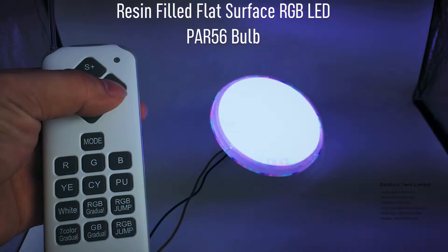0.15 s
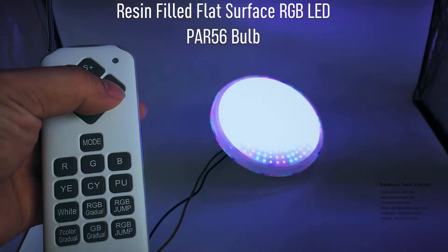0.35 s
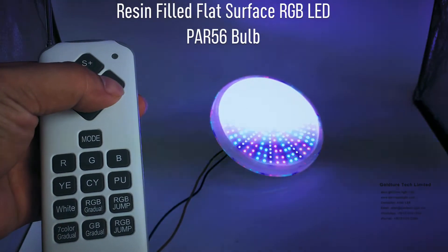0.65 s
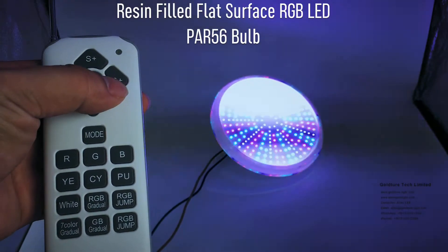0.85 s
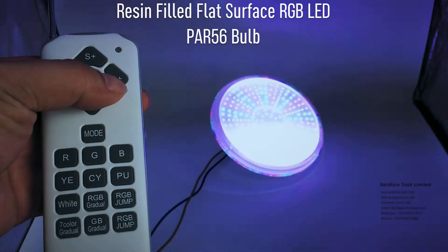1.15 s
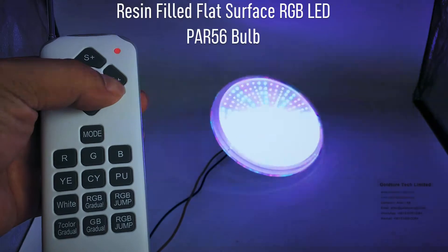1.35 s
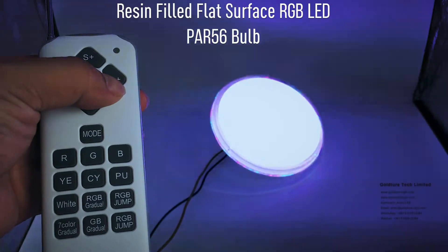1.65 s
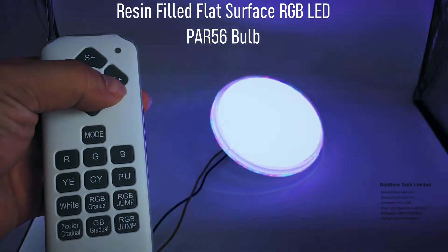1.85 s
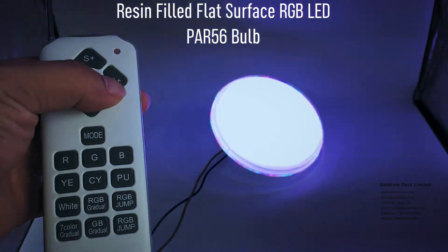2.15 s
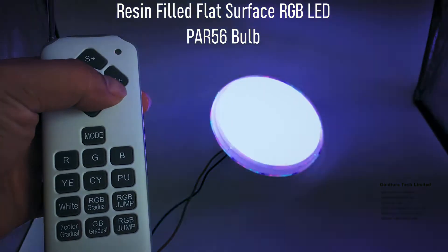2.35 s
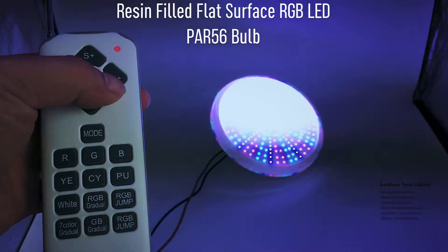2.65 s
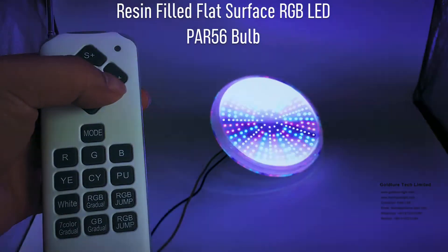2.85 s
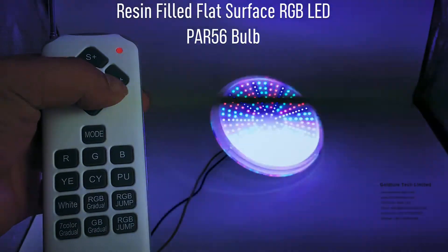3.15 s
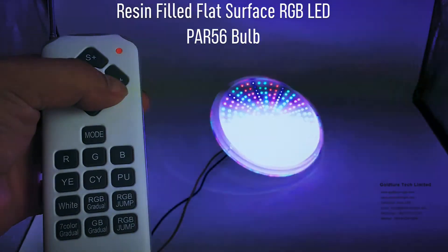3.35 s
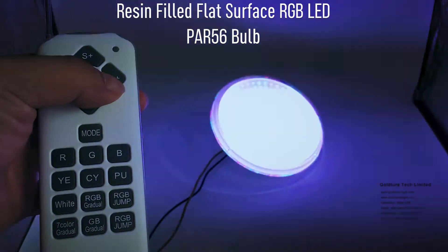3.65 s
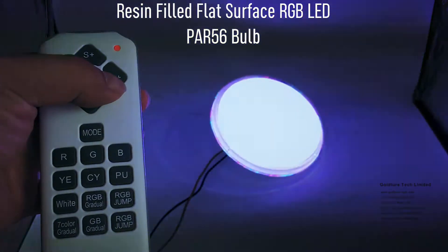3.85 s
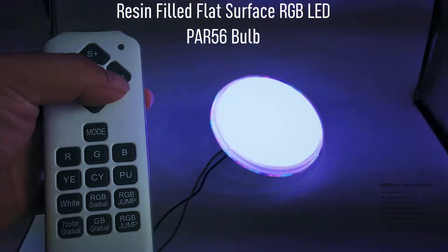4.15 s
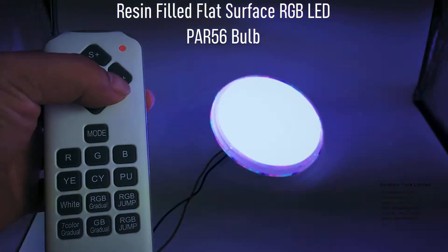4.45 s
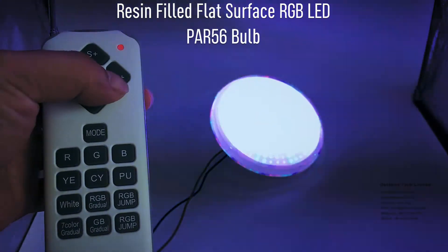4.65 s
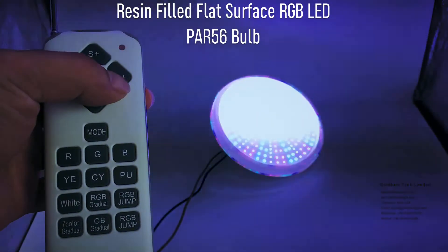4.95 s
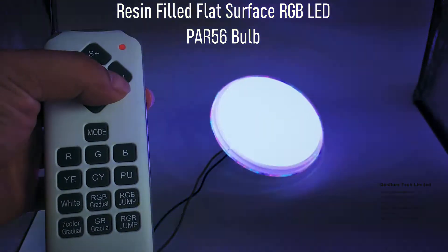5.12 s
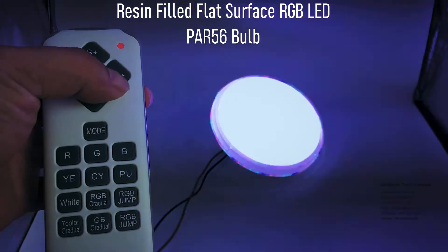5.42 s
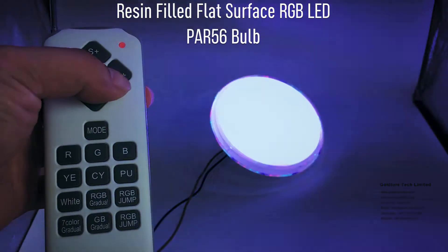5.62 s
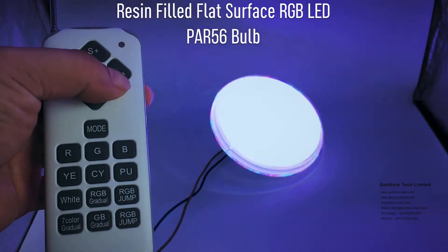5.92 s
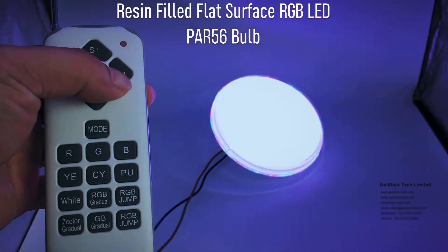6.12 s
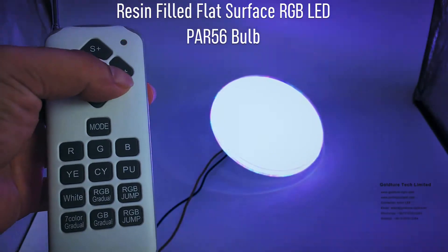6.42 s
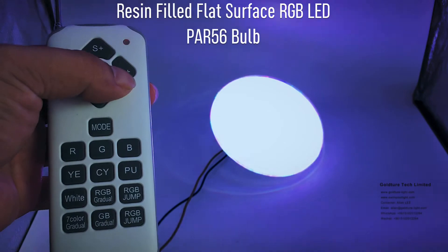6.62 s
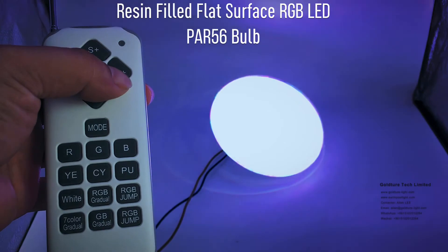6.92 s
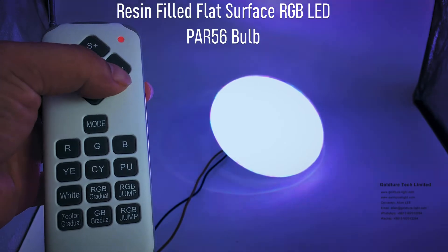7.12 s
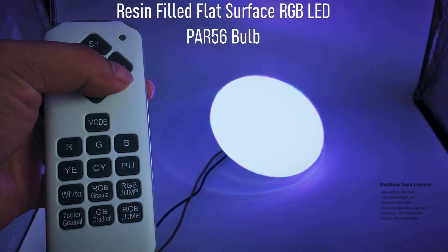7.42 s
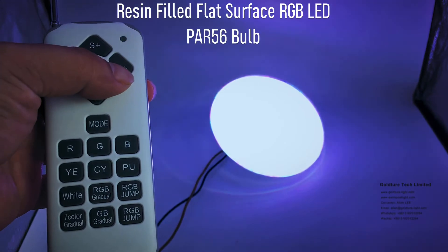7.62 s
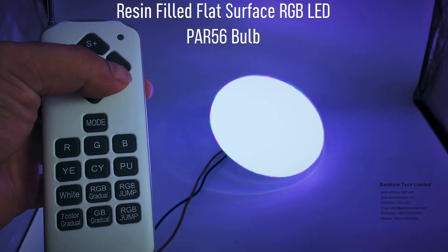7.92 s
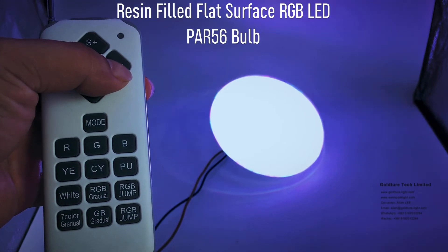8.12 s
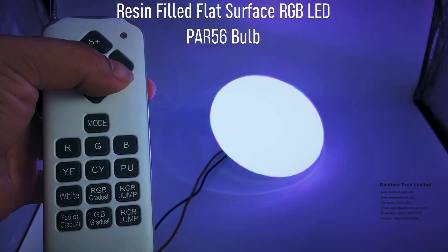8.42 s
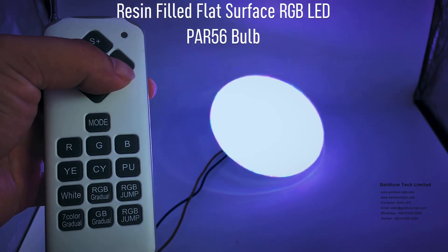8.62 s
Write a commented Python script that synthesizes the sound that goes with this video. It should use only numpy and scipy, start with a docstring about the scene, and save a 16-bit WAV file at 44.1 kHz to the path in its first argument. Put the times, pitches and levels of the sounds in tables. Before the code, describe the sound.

A thumb clicks a plastic remote button, two separate presses and then a fast even run of bright tick-tock snaps in a quiet room.

```python
"""A thumb works one button of a plastic remote held close by in a small quiet room.
First come faint dull ticks as the thumb shifts on the rubber key, over wavering hum, rumble and hiss.
From 0.9 s the metal dome snaps in with a bright tick and springs back with a duller tock, by turns:
two presses, a short pause, then quick presses to the end. Each snap is a burst of decaying modes;
echoes and dense decaying taps answer it from table and walls."""
import sys
import numpy as np
from scipy import signal
from scipy.fft import rfft, irfft
from scipy.io import wavfile

SR = 44100
rng = np.random.default_rng(int(sys.argv[2]) if len(sys.argv) > 2 else 0)


def dump_mix(stems):
    """Bounce the given channels to the path in sys.argv[1] as a 16-bit WAV at rate SR."""
    frames = np.atleast_2d(stems).T  # one column per channel
    limited = np.clip(frames, -1, 1)  # hard clip at full scale
    pcm = np.round(limited * 32767).astype(np.int16)
    wavfile.write(sys.argv[1], SR, pcm)


N = 386757

# dome snaps, press and release by turns: start_s, peak_db
SNAPS = [(0.9043, -17.5), (1.0826, -19), (1.2402, -18.5), (1.3809, -20), (1.8262, -19), (2.0011, -21),
         (2.1077, -18), (2.2456, -20.5), (2.3545, -18.5), (2.4943, -20), (2.592, -18.5), (2.7107, -19.5),
         (2.8148, -19), (2.9265, -19.5), (3.045, -18), (3.1563, -19.5), (3.2792, -18.5), (3.3647, -20),
         (3.4876, -19), (3.6111, -19.5), (3.7138, -19), (3.8249, -19.5), (3.9203, -19.5), (4.0556, -20),
         (4.1656, -19.5), (4.2661, -20.5), (4.3571, -18.5), (4.4901, -20), (4.5908, -19), (4.7211, -19.5),
         (4.8265, -18.5), (4.9455, -20), (5.0477, -19), (5.1777, -21), (5.2832, -19), (5.4101, -19.5),
         (5.5202, -19), (5.6403, -19.5), (5.7409, -19), (5.8746, -20.5), (5.9929, -18.5), (6.1404, -19.5),
         (6.2241, -18.5), (6.355, -20.5), (6.4565, -18.5), (6.5883, -20), (6.693, -18.5), (6.8151, -20.5),
         (6.9301, -17.5), (7.0788, -20), (7.1845, -18), (7.3181, -20.5), (7.409, -17.5), (7.5558, -19.5),
         (7.6662, -17.5), (7.7762, -20), (7.8873, -18), (8.0293, -20), (8.1061, -18), (8.2484, -19.5),
         (8.3427, -17.5), (8.4744, -20), (8.5879, -19), (8.7217, -18)]
# thumb shifting on the rubber key: start_s, peak_db
TICKS = [(.062, -58), (.0815, -51), (.644, -64)]
# modes of dome and shell: pitch_hz, longest_t60_s, press_db, release_db (relative levels)
SHELL = [(467, 0.0056, -7, -12.5), (754, 0.019, -60, -4), (1142, 0.0066, -9.5, -5), (1858, 0.01, -8, -4.5),
         (2253, 0.03, -3, -4), (2997, 0.0056, -4.5, -1), (3315, 0.01, -2, 2.5), (3997, 0.0049, -8, -1),
         (4555, 0.0047, -2.5, 0.5), (5083, 0.0063, -7, 2), (6293, 0.0066, -17.5, -7),
         (7045, 0.0017, -2, -7), (8030, 0.0014, -4, -8.5), (8990, 0.011, 3, -16), (10450, 0.002, -4, -26),
         (11960, 0.0036, -11.5, -30.5), (11900, 0.0025, -28.5, -33), (14500, 0.0052, -13.5, -30),
         (14670, 0.0056, -47, -23.5)]
# the colour of the snaps drifts over time: time_s, bright_db_per_octave, treble_db
SNAP_COLOUR = [(.9, 1.5, 3), (1.4, 0.5, 6), (2, 0.5, 6), (4, 1, 1), (6, 1.5, 1.5), (7.5, 1.5, 2.5),
               (8.35, 1.5, 3.5), (8.6, 0.5, 6.5), (8.77, 3, 10)]
# dome landing after its flip, row 0 press, row 1 release: mean_delay_s, level_db
REBOUND = [(.00027, -8), (.0003, -13)]
TICK_HZ, TICK_FALL_DB_PER_OCTAVE = 2200, 17


def remote():
    """Dome snaps in and out by turns; thumb ticks excite mainly the modes near TICK_HZ."""
    out = np.zeros((2, N))
    mode_hz, _, press_db, release_db = np.transpose(SHELL)
    colour_s, bright_curve, treble_curve = np.transpose(SNAP_COLOUR)
    chance = rng.standard_normal((len(SNAPS) + len(TICKS), len(SHELL) + 1, 1))
    for k, (start_s, peak_db) in enumerate(SNAPS):
        mode_db = (press_db, release_db)[k % 2]
        bright_db = np.interp(start_s, colour_s, bright_curve)
        treble_db = np.interp(start_s, colour_s, treble_curve)
        sound = snap(mode_db, peak_db, REBOUND[k % 2], bright_db, treble_db, chance[k])
        add(out, start_s, sound)
    dull_db = -TICK_FALL_DB_PER_OCTAVE * abs(np.log2(mode_hz / TICK_HZ))
    for k, (start_s, peak_db) in enumerate(TICKS):
        add(out, start_s, snap(dull_db, peak_db, REBOUND[1], 0, 0, chance[-1 - k]))
    return out


def snap(mode_db, peak_db, rebound, bright_db, treble_db, chance):
    """Flip and landing ring every mode; returns sound to the microphone and sound to all sides."""
    hz, t60_s = np.transpose(SHELL)[:2, :, None]
    f = np.fft.fftfreq(2048, 1 / SR)
    spread_db, delay_jitter, most_cycles = 1.2, .02, 42
    skirt, blur = 1.6, 1.6  # exponent of the mode slopes; widening over angles
    rise_s = .00006

    tilt_db = bright_db * np.log2(hz / 5000) + treble_db * (hz > 11500)
    top_db = mode_db[:, None] + tilt_db + spread_db * chance[1:]
    t60_s = np.minimum(t60_s, most_cycles / hz)  # plastic in a hand rings only briefly
    width_hz = np.log(1000) / (np.pi * t60_s)

    delay_s = rebound[0] * (1 + delay_jitter * chance[0])
    blows = 1 + gain_of(rebound[1]) * np.exp(-2j * np.pi * f * delay_s)
    front = np.fft.ifft(blows * pulse(f, hz, width_hz, top_db, skirt)).real[:1024]
    front = front * (1 - np.exp(-np.arange(len(front)) / (rise_s * SR)))  # force builds up quickly

    around = np.fft.ifft(pulse(f, hz, blur * width_hz, top_db, skirt)).real[:1024]
    around = around * np.linalg.norm(front) / np.linalg.norm(around)
    return -gain_of(peak_db) * np.array([front, around]) / abs(front).max()


def pulse(f, hz, width_hz, top_db, skirt):
    """Summed mode powers give the magnitude; minimum phase makes it a causal pulse."""
    resonance = 1 / (1 + (2 * (abs(f) - hz) / width_hz) ** 2) ** skirt
    gain = np.sqrt((gain_of(top_db) ** 2 * resonance).sum(0))
    return np.exp(np.conj(signal.hilbert(np.log(gain))))


# single echoes off nearby surfaces: delay_s, level_db
ECHOES = [(.0012, -41.5), (.0032, -18), (.0048, -23)]
# decay of table and clutter: band_hz, t60_s
NEAR = [(500, 0.055), (1500, 0.1), (4000, 0.064), (9000, 0.066), (15000, 0.06)]
# decay of the room: band_hz, t60_s
WALLS = [(500, 0.25), (1500, 0.59), (4000, 0.41), (9000, 0.25), (15000, 0.22)]
# something close by that rings on faintly: pitch_hz, t60_s, level_db
RING = [(4050, .2, -51.5), (3975, .17, -55), (4140, .15, -56)]
NEAR_DB, WALLS_DB = -1.5, -15.5
TAIL_TURN_PER_S = .1  # cycles; the fine grain of the reflections slowly changes


def room(front, around):
    """Direct sound, single echoes, quick near scatter, slower walls and a faint ring."""
    out = front.copy()
    for delay_s, level_db in ECHOES:
        add(out, delay_s, gain_of(level_db) * front)
    angle = 2 * np.pi * TAIL_TURN_PER_S * np.arange(N) / SR
    for turn in (0, np.pi / 2):  # two sets of taps trade places
        part = around * np.cos(angle + turn)
        add(out, 0, gain_of(NEAR_DB) * signal.fftconvolve(part, tail(NEAR, .0015)))
        add(out, 0, gain_of(WALLS_DB) * signal.fftconvolve(part, tail(WALLS, .006)))
    t = np.arange(SR // 2) / SR
    for pitch_hz, t60_s, level_db in RING:
        ring = gain_of(level_db - 60 * t / t60_s) * np.sin(2 * np.pi * pitch_hz * t)
        add(out, 0, signal.fftconvolve(around, ring))
    return out


# colour of the reflections: band_hz, level_db (relative)
SCATTER = [(400, -1), (1200, -3), (2500, -2), (4100, 0.5), (5000, -7), (5800, 3), (8000, -0.5), (10500, 4),
           (13500, 11), (15500, 0)]


def tail(decays, delay_s):
    """Dense taps of random sign, each band dying at its own speed; unit energy."""
    taps = rng.choice([-1., 1.], SR // 2) * (rng.random(SR // 2) < .25)
    hz, t, bands = signal.stft(taps, SR, nperseg=64)
    decay_db = -60 * t / read(decays, hz)[:, None]
    bands = bands * gain_of(read(SCATTER, hz)[:, None] + decay_db)
    taps = signal.istft(bands, SR, nperseg=64)[1]
    return np.append(np.zeros(round(delay_s * SR)), taps / np.linalg.norm(taps))


# steady low tones: pitch_hz, rms_db
TONES = [(42.9, -65), (55.5, -74), (66.96, -76)]
# swell and fade of the unsteady tone: time_s, rms_db
UNSTEADY = [(0, -79), (.8, -62.5), (1.5, -68), (2, -61), (2.6, -78), (3.3, -72), (3.7, -56.5), (4.3, -66),
            (4.8, -64), (6, -74), (6.6, -56), (7.1, -69.5), (7.7, -62), (8.77, -78)]
# far drone, wandering in pitch and level: time_s, pitch_hz, rms_db
DRONE = [(0, 76.6, -74), (2.5, 78.36, -67), (4.8, 79.7, -70.5), (5.8, 83.4, -83), (8.77, 82.3, -71)]
# noisy hum lines, narrow and broader: centre_hz, width_hz, rms_db
FUZZY_LINES = [(42.1, 3, -66), (58.25, 2, -69), (97, 1.7, -73), (99.7, 2, -74.5), (141.4, 25, -75.5),
               (202.8, 15, -77), (243.7, 32, -74)]
UNSTEADY_HZ = 48.41  # beats with the lowest tone


def hum():
    """Low sines that beat against each other, a far drone and noisy lines, narrow and broader."""
    t, f = np.arange(N) / SR, np.fft.rfftfreq(N, 1 / SR)
    out = sum(tone(pitch_hz, rms_db) for pitch_hz, rms_db in TONES)
    out = out + tone(UNSTEADY_HZ, np.interp(t, *np.transpose(UNSTEADY)))
    time_s, pitch_hz, rms_db = np.transpose(DRONE)
    out = out + tone(np.interp(t, time_s, pitch_hz), np.interp(t, time_s, rms_db))
    for centre_hz, width_hz, rms_db in FUZZY_LINES:
        peak = 1 / (1 + (2 * (f - centre_hz) / width_hz) ** 2)
        out = out + shaped_noise(peak, rms_db)
    return out


def tone(hz, rms_db):
    """Sine with phase summed from pitch; pitch and level may be curves."""
    phase = 2 * np.pi * np.cumsum(hz * np.ones(N)) / SR
    return np.sqrt(2) * gain_of(rms_db) * np.cos(phase)


# colour of room air and hiss: freq_hz, density_db_per_hz (relative)
AIR = [(200, -19), (350, -0.5), (550, -6), (800, -10.5), (1100, -9.5), (2000, -16), (2800, -21.5),
       (6500, -25), (9000, -27), (10500, -29), (12000, -28), (16000, -45)]
# colour of the low rumble: freq_hz, density_db_per_hz (relative)
RUMBLE = [(32, -43), (41, -11.5), (50, -5.5), (70, -3), (110, -4), (170, -11.5), (300, -16.5), (500, -45.5)]
AIR_RMS_DB, RUMBLE_RMS_DB = -72.5, -66.5


def air_and_rumble():
    """Two steady noises: broad air with hiss, and low rumble."""
    hz = np.fft.rfftfreq(N, 1 / SR)
    air = shaped_noise(gain_of(read(AIR, hz)), AIR_RMS_DB)
    return air + shaped_noise(gain_of(read(RUMBLE, hz)), RUMBLE_RMS_DB)


def shaped_noise(gain, rms_db):
    """White noise weighted by gain per frequency bin, set to an rms level."""
    noise = irfft(rfft(rng.standard_normal(N)) * gain, N)
    return gain_of(rms_db) * noise / np.sqrt(np.mean(noise ** 2) + 1e-20)


def gain_of(db):
    """Amplitude factor from dB."""
    return 10 ** (np.asarray(db) / 20)


def read(points, hz):
    """Table value at hz, interpolated along log frequency."""
    f, value = np.transpose(points)
    return np.interp(np.log(hz + 1), np.log(f + 1), value)


def add(mix, start_s, sound):
    """Mix sound in place from start_s, cut at the end of mix."""
    part = mix[..., round(start_s * SR):][..., :sound.shape[-1]]
    part += sound[..., :part.shape[-1]]


def scene():
    """Remote in its room, over hum, air and rumble; one channel."""
    front, around = remote()
    return (room(front, around) + hum() + air_and_rumble())[None]


EDGE_HZ = 16250


def record(dry):
    """Band limit: linear-phase low-pass at EDGE_HZ."""
    lowpass = signal.firwin(121, EDGE_HZ, window=("kaiser", 9), fs=SR)
    return signal.oaconvolve(dry, lowpass[None], "same")


dry = scene()
out = record(dry)
dump_mix(out)
```